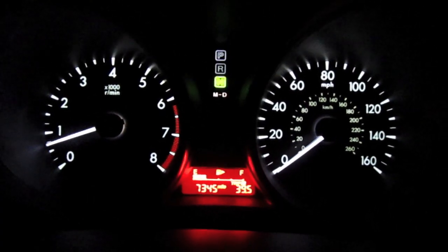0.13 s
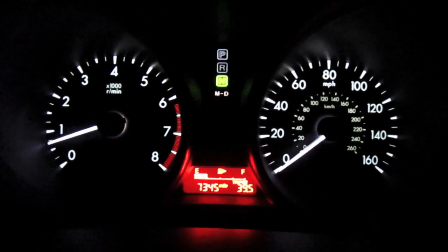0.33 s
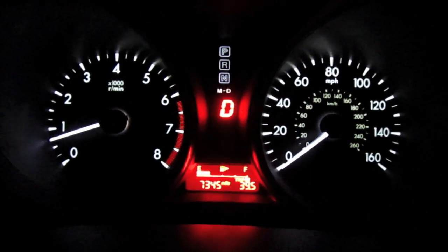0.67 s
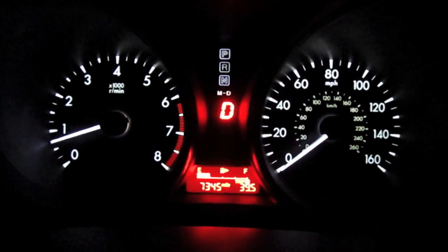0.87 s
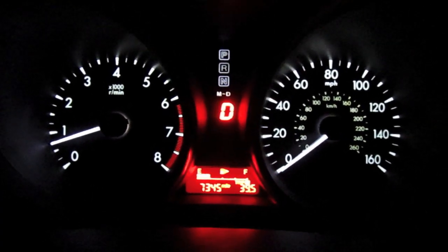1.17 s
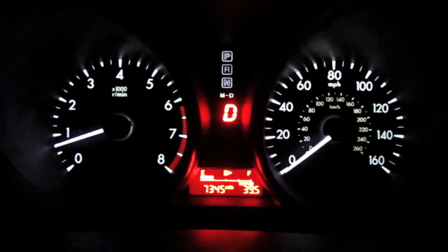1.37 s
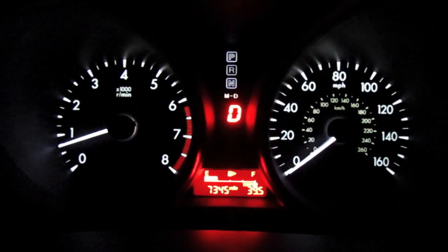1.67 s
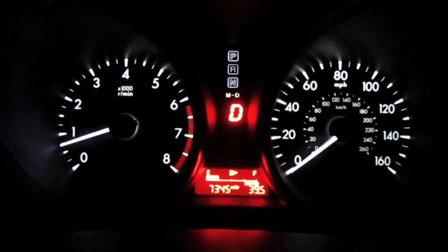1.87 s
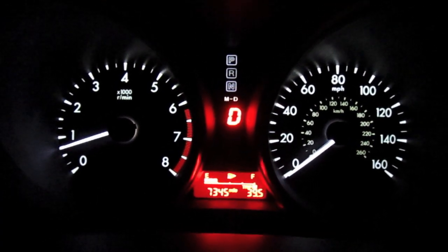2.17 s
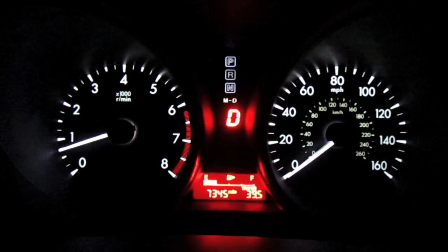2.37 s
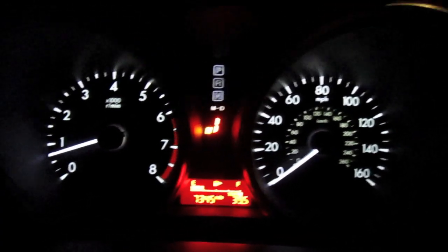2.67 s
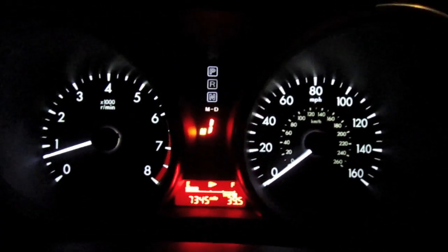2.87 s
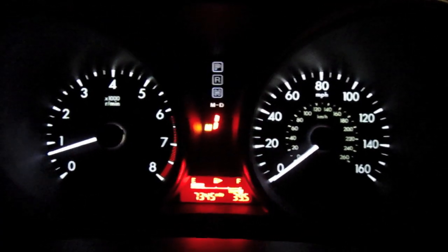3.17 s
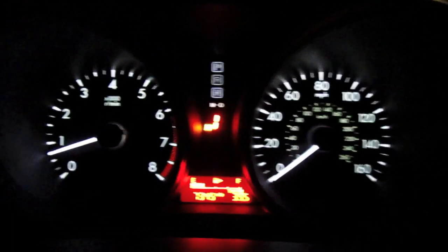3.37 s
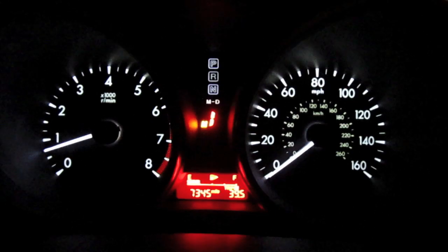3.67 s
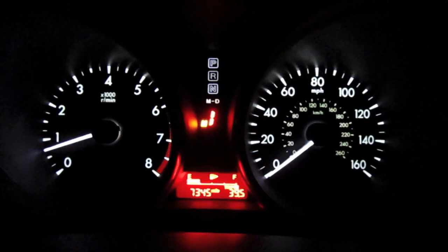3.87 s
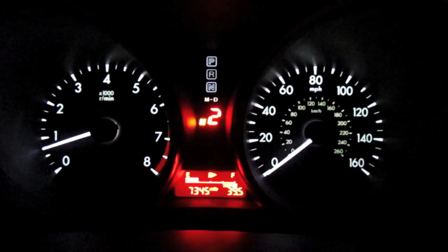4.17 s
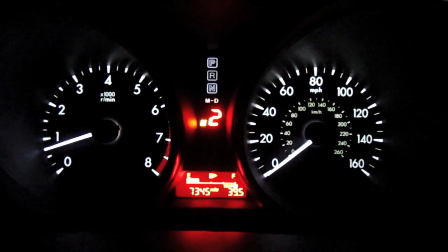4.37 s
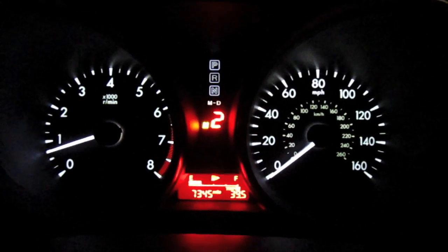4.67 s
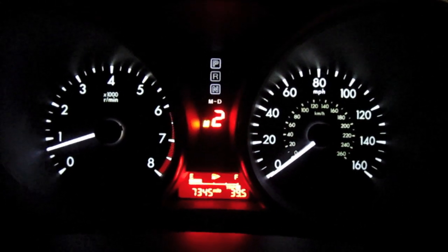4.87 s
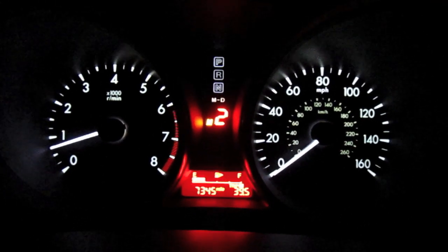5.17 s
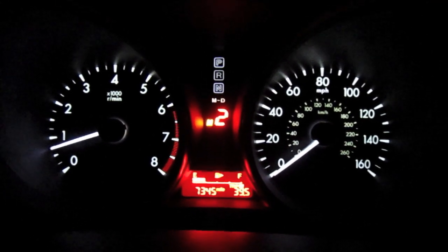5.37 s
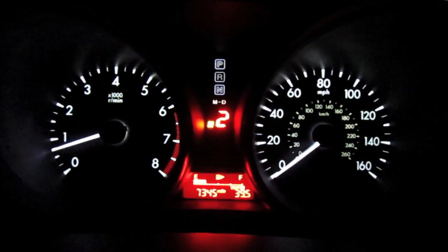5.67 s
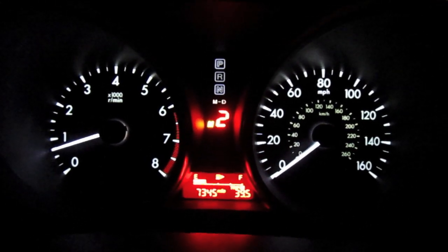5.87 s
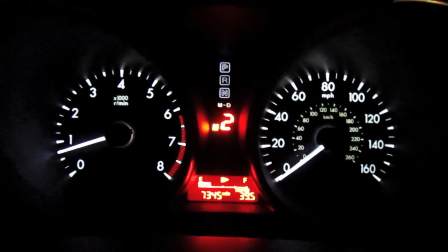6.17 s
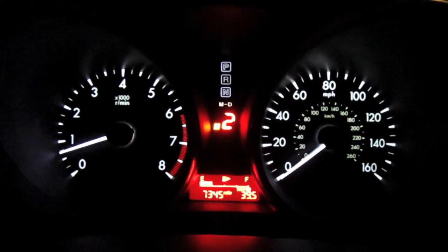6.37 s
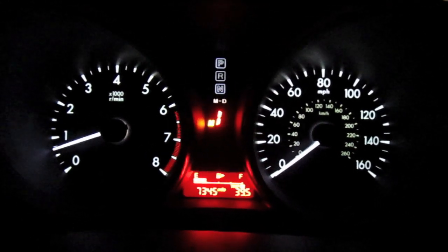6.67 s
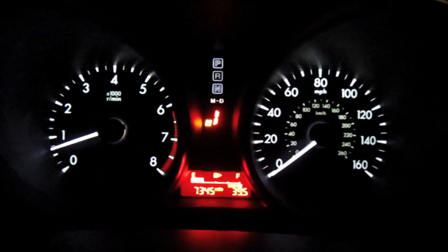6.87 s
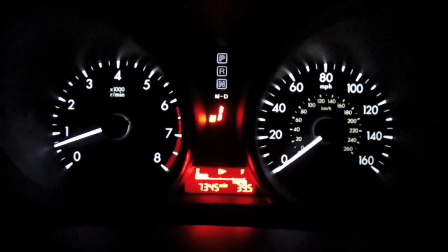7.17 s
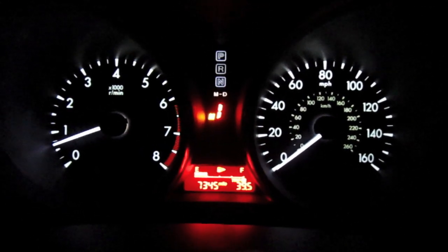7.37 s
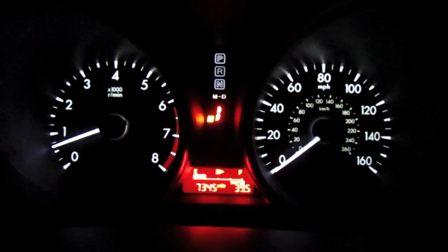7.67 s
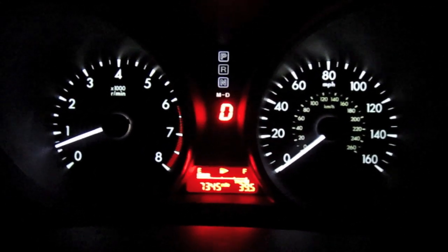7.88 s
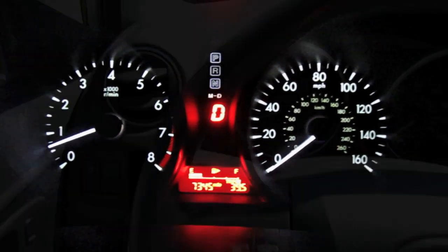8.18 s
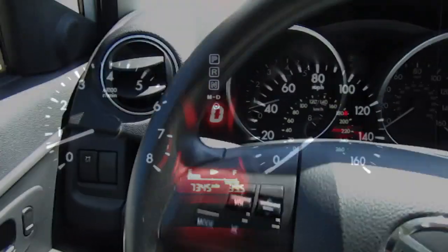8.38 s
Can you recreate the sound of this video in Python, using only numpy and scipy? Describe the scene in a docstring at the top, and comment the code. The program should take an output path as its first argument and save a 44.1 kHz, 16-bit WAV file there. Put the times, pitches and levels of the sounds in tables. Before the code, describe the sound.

Inside a car, a low engine idle throbs while the gear lever clunks into drive, is nudged repeatedly with soft double clicks, then clunks back.

```python
"""In a car, from the driver's seat: a four-cylinder engine idles (summed firing orders, throbbing noise).
A lever clunks into drive, then across into the manual gate, is nudged and clunks back: contacts ring
console and cabin modes. The idle wanders and sags under load, and the car shudders. Nudges tick, bump a
stop and snap back; a hand brushes the knob. Behind: fan tones over hiss, and a camera's thin whine.
After the last clunk the whole level dips briefly, then returns a little higher."""
import sys
import numpy as np
from scipy import signal
from scipy.fft import rfft, irfft, next_fast_len
from scipy.io import wavfile

SR = 44100
rng = np.random.default_rng(int(sys.argv[2]) if len(sys.argv) > 2 else 0)


def file_out(sig):
    """Save sig as 16-bit WAV at sys.argv[1]."""
    # one column per channel
    cols = np.atleast_2d(sig).T
    # limit, then scale
    lim = np.clip(cols, -1, 1)
    pcm = np.round(lim * 32767).astype(np.int16)
    wavfile.write(sys.argv[1], SR, pcm)


N = 375732
T = np.arange(N) / SR

# engine speed: t/s, firing rate/Hz
IDLE = [(0, 22.4), (1.1, 22.1), (1.6, 24.4), (3, 23.2), (4, 24.7), (5.3, 23), (6.15, 20.9), (7.4, 19.8),
        (8.52, 20.6)]
# engine orders: multiple of firing rate, level re boom/dB
ORDERS = [(1, -2), (2, -5), (3, -20), (4, -14.5), (5, -17.5), (6, -24.5), (7, -18.5), (9, -25), (11, -30.5)]
# engine and air noise colour: f/Hz, relative density/dB
RUMBLE_COLOUR = [(30, 0.5), (60, 2), (90, -5), (130, -5.5), (190, -10.5), (250, -13.5), (330, -12.5),
                 (450, -17), (600, -18.5), (800, -22), (1100, -27.5), (1800, -42.5), (4000, -64)]
# the boom weakens only below the usual idle
USUAL_FIRING_HZ, BOOM_DB, BOOM_DB_PER_HZ = 23.3, -33.0, 2


def engine(uneven_db=2.1, order_flutter_db=2.5, rumble_db=-40.5, throb=0.13):
    """Firings shake the body at low orders and make the rumble throb; a slow idle booms less."""
    firing_hz = np.interp(T, *np.transpose(IDLE))
    boom_db = BOOM_DB + BOOM_DB_PER_HZ * np.minimum(firing_hz - USUAL_FIRING_HZ, 0)
    phase = 2 * np.pi * np.cumsum(firing_hz * (1 + 0.0054 * drift(4.6))) / SR
    boom = 0
    for order, db in ORDERS:
        if order <= 2:  # rocks the whole car
            flutter_db, lag = uneven_db, 0
        else:  # through panels, each with its own lag
            flutter_db = order_flutter_db
            lag = rng.uniform(0, 2 * np.pi) + .5 * drift(1.5)
        gain = from_db(db + flutter_db * drift(4.6))
        boom = boom - np.sqrt(2) * np.cos(order * phase - lag) * gain
    throbbing = noise(RUMBLE_COLOUR) * (1 + throb * np.cos(phase))
    # the rumble follows the boom level weakly
    rumble = throbbing * from_db(rumble_db + 0.16 * (boom_db - boom_db.mean()))
    return boom * from_db(boom_db) + rumble


# a gear takes up the load: t/s, level before low-pass/dB, f/Hz
SHUDDERS = [(.44, -30, 32), (1.03, -23, 27.2), (1.23, -27, 27)]


def shudder(t60_s=0.97, onset_hz=70):
    """The engine rocks slowly on its rubber mounts, which round off the onset."""
    mounts = signal.butter(2, onset_hz, fs=SR, output="sos")
    return signal.sosfilt(mounts, pings(SHUDDERS, t60_s))


# plastic crack colour: f/Hz, relative density/dB
CRACK_COLOUR = [(300, 10.5), (800, 8), (1150, -6.5), (1500, -1.5), (2100, 2), (3000, -2), (4300, -6),
                (6000, -9.5), (8000, -17), (11000, -18), (15500, -27)]


def gate_changes(knock_db=-5.5):
    """The lever slides over a detent, strikes and lands: several contacts in quick succession."""
    rows = clunk_contacts()
    thump = thumps(rows[:, :3], t60_s=0.18, cabin_db=6.0)
    knock = knocks(rows[:, [0, 3]], soft_hz=5000, chatter=0.06, chatter_t60_s=0.041, spread_db=1.5,
                   trim_db=-0.5, trim_t60_s=0.13, trim_rise_s=0.0032)
    crack = noise(CRACK_COLOUR) * bursts(rows[:, [0, 4]], rise_s=0.0015, t60_s=0.05)
    plastic_ring = pings(rows[:, [0, 5, 6]], t60_s=0.056)
    return thump + from_db(knock_db) * knock + crack + plastic_ring


# gate changes: strike t/s, slide before it/s, thump level/dB, thump f/Hz, crack level/dB, ring level/dB,
# ring f/Hz, landing thump level/dB, landing thump f/Hz, landing ring f/Hz
CLUNKS = [(.414, 0.0055, -17.5, 138.6, -25, -25, 950, -15, 55.7, 578),
          (2.419, .011, -18.5, 116.6, -26.5, -24, 1557, -13, 104.5, 330),
          (7.770, .029, -17.5, 99, -12, -15, 790, -13, 93.9, 214)]
# knock levels here are before knock_db of gate_changes
STRIKE_KNOCK_DB = -18.5
# two light touches on the detent, the second harder
DETENT_THUMP_DB, DETENT_KNOCK_DB, DETENT_CRACK_DB = -33, -31.5, -35
DETENT_RING_DB, DETENT_RING_HZ, DETENT_GROWTH_DB = -31.5, 815, 4
# heavy, dull landing after the strike
LANDING_S, LANDING_KNOCK_DB, LANDING_CRACK_DB, LANDING_RING_DB = .008, -22.5, -33.5, -20


def clunk_contacts():
    """Detent touches, strike, landing: t/s, thump/dB, thump f/Hz, knock/dB, crack/dB, ring/dB, ring f/Hz."""
    rows = []
    for (s, slide_s, thump_db, thump_hz, crack_db, ring_db, ring_hz,
         landing_db, landing_hz, landing_ring_hz) in CLUNKS:
        for lead_s, up_db in ((slide_s, 0), (slide_s / 2, DETENT_GROWTH_DB)):
            rows.append((s - lead_s, DETENT_THUMP_DB + up_db, thump_hz, DETENT_KNOCK_DB + up_db,
                         DETENT_CRACK_DB + up_db, DETENT_RING_DB + up_db, DETENT_RING_HZ))
        rows.append((s, thump_db, thump_hz, STRIKE_KNOCK_DB, crack_db, ring_db, ring_hz))
        rows.append((s + LANDING_S, landing_db, landing_hz, LANDING_KNOCK_DB,
                     LANDING_CRACK_DB, LANDING_RING_DB, landing_ring_hz))
    return np.array(rows)


# cabin air modes: f/Hz, relative level/dB, t60/s
CABIN = [(45.6, -15.5, 0.76), (60.5, -17, 0.76), (111, -19.5, 0.24), (126, -18.5, 0.45), (169.2, -18, 0.48)]


def thumps(rows, t60_s, cabin_db):
    """The lever's mass rocks the console, and the cabin air booms after it."""
    push = np.zeros(N)
    push[(rows[:, 0] * SR).astype(int)] = from_db(rows[:, 1] + cabin_db)
    boom = 0
    for k, (hz, mode_db, mode_t60_s) in enumerate(CABIN):
        boom = boom + (-1) ** k * from_db(mode_db) * ring(push, hz, mode_t60_s)
    return pings(rows, t60_s) + boom


# lever and console modes: f/Hz, relative level/dB, t60/s
CONSOLE = [(151.7, -7, 0.45), (219, -6, 0.22), (341.7, -2.5, 0.14), (445, -4, 0.15), (553, -4.5, 0.098),
           (670, -3.5, 0.058), (781, -2.5, 0.055), (828, 0, 0.051), (993, -11, 0.072), (1347, -14.5, 0.056),
           (1514, -4, 0.033), (1940, -30, 0.054), (2320, -21, 0.019), (2590, -16.5, 0.075)]
# dense, overlapping dashboard trim modes, as noise: f/Hz, relative density/dB
TRIM_COLOUR = [(190, 2.5), (260, -1), (350, -6), (500, -3.5), (800, -10), (1300, -19.5), (3000, -43.5)]


def knocks(rows, soft_hz, chatter, chatter_t60_s, spread_db, trim_db, trim_t60_s, trim_rise_s):
    """Contacts and their brief chatter ring console and trim; a soft contact spares the high modes."""
    s, db = rows.T
    rattle = chatter * bursts(rows, rise_s=0.00099, t60_s=chatter_t60_s)
    console = np.zeros(N)
    for k, (hz, mode_db, t60_s) in enumerate(CONSOLE):
        force = rattle * rng.standard_normal(N)
        hit_db = db + spread_db * rng.standard_normal(len(s))
        force[(s * SR).astype(int)] += (-1) ** k * from_db(hit_db)
        softness = 1 / (1 + (hz / soft_hz) ** 2)
        console += from_db(mode_db) * softness * ring(force, hz, t60_s)
    trim = noise(TRIM_COLOUR) * bursts(rows, rise_s=trim_rise_s, t60_s=trim_t60_s)
    return console + from_db(trim_db) * trim


# lever nudges: push t/s, snap back t/s, stop bump level/dB, snap level/dB
NUDGES = [(3.149, 3.558, -25, -31.5), (4.055, 4.451, -25.5, -38.5), (4.837, 5.304, -25, -38),
          (6.397, 6.722, -25, -35)]
# the hand takes hold: t/s, thump level/dB, thump f/Hz, knock level before bump_db/dB
GRIPS = [(1.058, -37, 520, -42), (2.065, -40, 122, -39.5), (6.158, -31, 130, -38)]
# other switch ticks, two of them just before gate changes: t/s, level before tick_db/dB, ring f/Hz
OTHER_TICKS = [(.499, -52, 4470), (2.394, -44.5, 8530), (5.406, -51.5, 6500), (7.418, -50.5, 10550),
               (7.695, -46.5, 8750)]
# snap colour: f/Hz, relative density/dB
SNAP_COLOUR = [(300, 10), (900, 1.5), (1400, -2), (1750, -0.5), (2100, -4), (2500, -1), (3200, -5),
               (4400, -3), (5200, -12), (6200, -12), (8000, -30), (15000, -34)]
# switch ticks at the push and just before the snap; levels before tick_db
PUSH_TICK_DB, PUSH_TICK_HZ = -47.5, 10900
RELEASE_TICK_DB, RELEASE_TICK_HZ, RELEASE_LEAD_S = -47.5, 8560, .056
# from the push: spring taken up with a faint snap, then the stop
TAKE_UP_S, TAKE_UP_DB, TRAVEL_S = 0.0193, -46.5, .033
BUMP_HZ, BUMP_KNOCK_DB = 133, -35  # thump pitch; knock level before bump_db


def nudges(bump_db=-5.5, tick_db=0.5):
    """The switch ticks, the lever meets a rubber stop, and a spring snaps it back."""
    ticks, stops, springs = list(OTHER_TICKS), list(GRIPS), []
    for push_s, snap_s, stop_db, snap_db in NUDGES:
        ticks.append((push_s, PUSH_TICK_DB, PUSH_TICK_HZ))
        ticks.append((snap_s - RELEASE_LEAD_S, RELEASE_TICK_DB, RELEASE_TICK_HZ))
        stops.append((push_s + TRAVEL_S, stop_db, BUMP_HZ, BUMP_KNOCK_DB))
        springs += [(push_s + TAKE_UP_S, TAKE_UP_DB), (snap_s, snap_db)]
    rows = np.array(stops)
    thump = thumps(rows[:, :3], t60_s=0.15, cabin_db=-0.5)
    knock = knocks(rows[:, [0, 3]], soft_hz=1140, chatter=0.089, chatter_t60_s=0.077, spread_db=5.5,
                   trim_db=0.5, trim_t60_s=0.19, trim_rise_s=.008)
    snaps = noise(SNAP_COLOUR) * bursts(springs, rise_s=0.001, t60_s=0.07)
    return thump + from_db(bump_db) * knock + from_db(tick_db) * switch_ticks(ticks) + snaps


# tick colour: f/Hz, relative density/dB
TICK_COLOUR = [(1200, 5), (2800, 4), (4500, 3.5), (7000, 1.5), (11500, -6), (15500, -14)]


def switch_ticks(ticks, width_hz=1100, ring_db=1.0):
    """Each tick is a tiny burst of noise with one plastic resonance."""
    grain, out = noise(TICK_COLOUR), np.zeros(N)
    for s, db, hz in ticks:
        tick = grain * bursts([(s, db)], rise_s=0.0018, t60_s=0.078)
        b, a = signal.iirpeak(hz, hz / width_hz, fs=SR)
        out += tick + from_db(ring_db) * signal.lfilter(b, a, tick + 1e-18)
    return out


# hand over the lever knob: start t/s, swell/s, start to release/s, level/dB
BRUSHES = [(4.25, .55, 0.67, -60.5), (8.2, .012, .3, -62.5)]
# brush colour: f/Hz, relative density/dB
BRUSH_COLOUR = [(800, -8), (1300, 6), (1900, -7), (2400, -6), (2750, 0.5), (3200, -9), (5000, -13),
                (12000, -26)]
BRUSH_RELEASE_S = .15


def brushes():
    """A hand rubbing on the knob: each noise stroke swells, holds and fades."""
    strokes = 0
    for s, swell_s, length_s, db in BRUSHES:
        fade = 1 - ramp(s + length_s, BRUSH_RELEASE_S)
        strokes = strokes + from_db(db) * ramp(s, swell_s) * fade
    return strokes * noise(BRUSH_COLOUR)


# fan tones: f/Hz, level/dB
FAN = [(144.3, -47), (295, -59.5), (589.5, -58), (836, -65.5), (968, -70.5)]
# fan hiss colour: f/Hz, relative density/dB
HISS_COLOUR = [(700, 7), (1400, 5), (2800, 1.5), (3700, -1.5), (4600, -0.5), (5600, -4), (8000, -6),
               (11000, -10), (15500, -16)]


def fan(waver_hz=1.23, flutter_db=2.0, hiss_db=-57.5):
    """Slightly wavering fan tones over an even hiss."""
    tones = 0
    for hz, db in FAN:
        phase = 2 * np.pi * np.cumsum(hz + waver_hz * drift(3.11)) / SR
        tones = tones + np.sqrt(2) * np.sin(phase) * from_db(db + flutter_db * drift(4.7))
    return tones + from_db(hiss_db) * noise(HISS_COLOUR)


WHINE_HZ, FLIPS_PER_S = 7867, 29.97


def camera_whine(whine_db=-60.0, sharpness=30):
    """An electrical whistle whose sign flips at the picture rate."""
    flips = np.tanh(sharpness * np.sin(np.pi * FLIPS_PER_S * T))
    return from_db(whine_db) * np.sqrt(2) * np.sin(2 * np.pi * WHINE_HZ * T) * flips


def from_db(db):
    """Decibels to gain."""
    return 10 ** (np.asarray(db) / 20)


def rms_one(x):
    """Scale to unit rms."""
    return x / np.sqrt(np.mean(x ** 2) + 1e-20)


def ramp(start_s, length_s):
    """Goes from 0 to 1 in a straight line."""
    return np.clip((T - start_s) / length_s, 0, 1)


def drift(rate_hz):
    """Slow random wander of spread 1: two-pole noise on every 100th sample, interpolated."""
    r = np.exp(-200 * np.pi * rate_hz / SR)
    white = rng.standard_normal(N // 100 + 2002)
    slow = signal.lfilter([1], [1, -2 * r, r * r], white)[2000:]  # skip the settling
    return np.interp(np.arange(N) / 100, np.arange(len(slow)), rms_one(slow))


def noise(spectrum):
    """Noise of a given colour, rms 1, rolled off around half its lowest listed frequency."""
    size = next_fast_len(N)
    hz = np.maximum(np.arange(size // 2 + 1) * SR / size, 1)
    points_hz, db = np.transpose(spectrum)
    colour = from_db(np.interp(np.log(hz), np.log(points_hz), db))
    gain = colour / (1 + (points_hz[0] / 2 / hz) ** 2)
    return rms_one(irfft(rfft(rng.standard_normal(size)) * gain, size)[:N])


def ring(force, hz, t60_s):
    """Two-pole resonator: a unit click sets a damped sine of height 1 ringing."""
    r, w = from_db(-60 / (t60_s * SR)), 2 * np.pi * hz / SR
    return signal.lfilter([0, np.sin(w)], [1, -2 * r * np.cos(w), r * r], force + 1e-18)


def bursts(events, rise_s, t60_s):
    """Envelope of events (t/s, level/dB) that swell quickly and die away."""
    out = np.zeros(N)
    for s, db in events:
        at = int(s * SR)
        age_s = T[:min(SR // 2, N - at)]
        decay = from_db(db - 60 * age_s / t60_s)
        out[at:at + len(age_s)] += decay * (1 - np.exp(-age_s / rise_s))
    return out


def pings(rows, t60_s):
    """A damped sine for each row (t/s, level/dB, f/Hz)."""
    out = np.zeros(N)
    for s, db, hz in rows:
        at = int(s * SR)
        age_s = T[:min(SR // 2, N - at)]
        decay = from_db(db - 60 * age_s / t60_s)
        out[at:at + len(age_s)] += np.sin(2 * np.pi * hz * age_s) * decay
    return out


# overall level; the dip and the later rise are relative to it
LEVEL_DB, DIP_START_S, DIP_DB, DIP_END_S, AFTER_DIP_DB = -1.1, 7.81, -2.5, 8.21, 2.0
LEVEL_GLIDE_S = 0.009


def scene():
    """Everything as it reaches one microphone behind the wheel."""
    dip_db = DIP_DB * ramp(DIP_START_S, LEVEL_GLIDE_S)
    rise_db = (AFTER_DIP_DB - DIP_DB) * ramp(DIP_END_S, LEVEL_GLIDE_S)
    cabin = engine() + shudder() + gate_changes() + nudges() + brushes() + fan()
    return ((cabin + camera_whine()) * from_db(LEVEL_DB + dip_db + rise_db))[None]


CUTOFF_HZ = 15600


def record(dry):
    """The microphone drops infrasound; the top is cut steeply."""
    heard = signal.sosfilt(signal.butter(1, 8, "high", fs=SR, output="sos"), dry)
    return signal.sosfilt(signal.ellip(12, .1, 90, CUTOFF_HZ, fs=SR, output="sos"), heard)


dry = scene()
out = record(dry)
file_out(out)
```